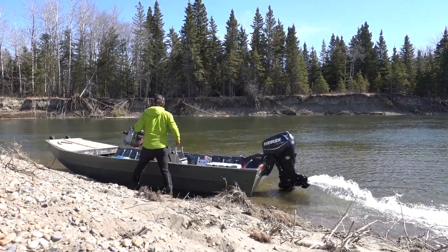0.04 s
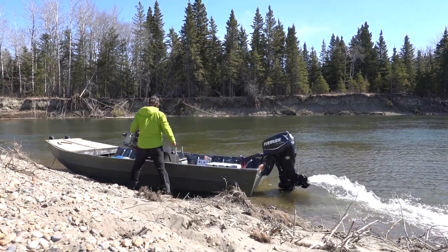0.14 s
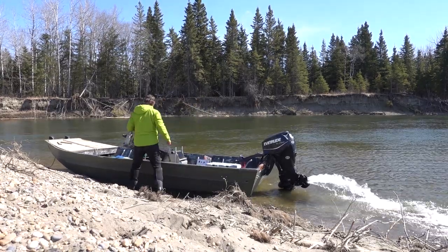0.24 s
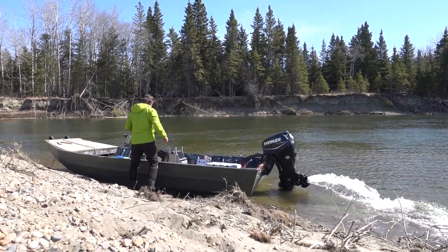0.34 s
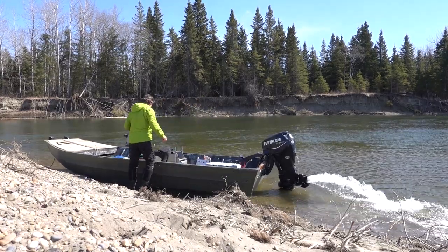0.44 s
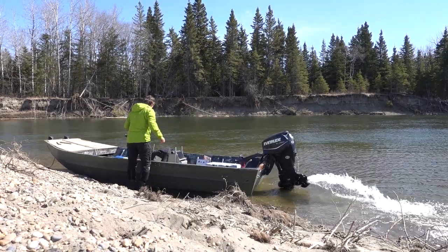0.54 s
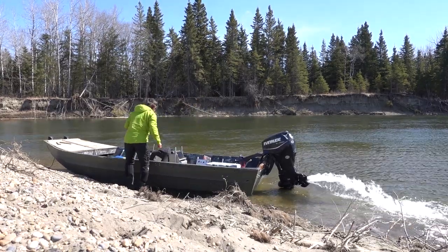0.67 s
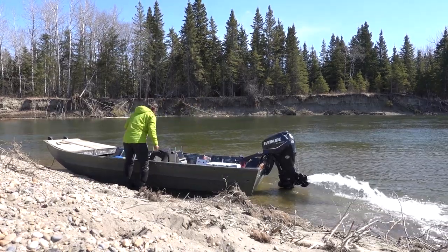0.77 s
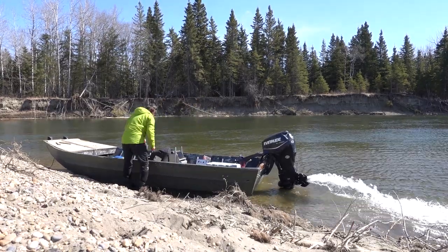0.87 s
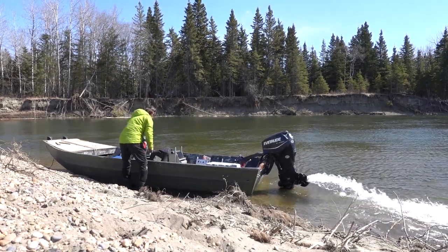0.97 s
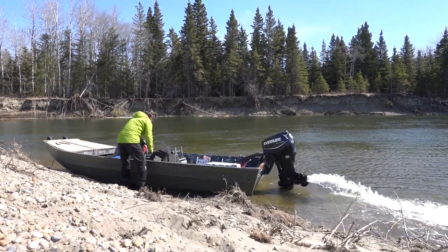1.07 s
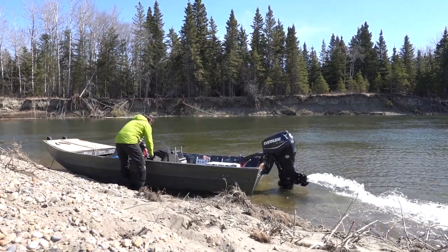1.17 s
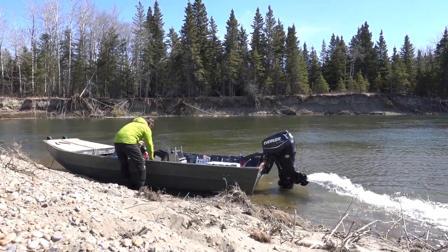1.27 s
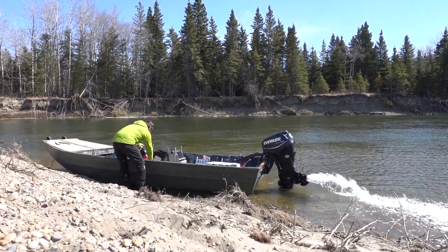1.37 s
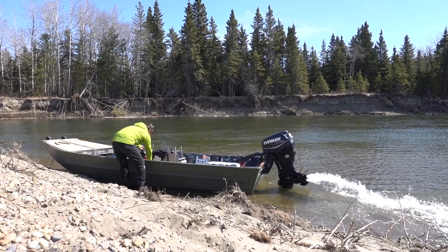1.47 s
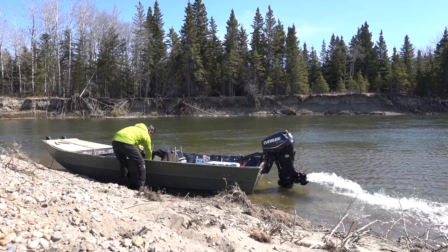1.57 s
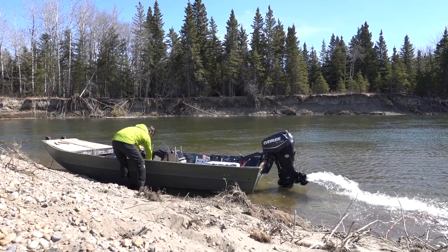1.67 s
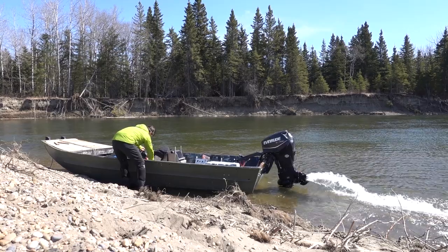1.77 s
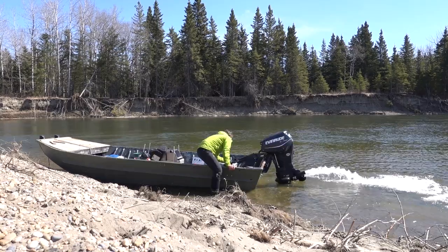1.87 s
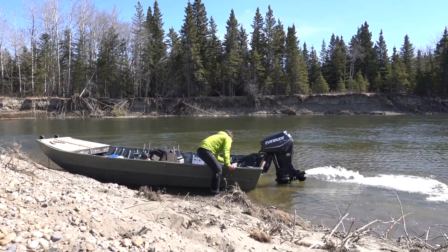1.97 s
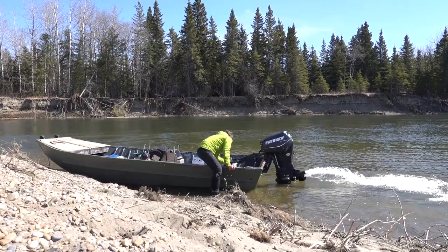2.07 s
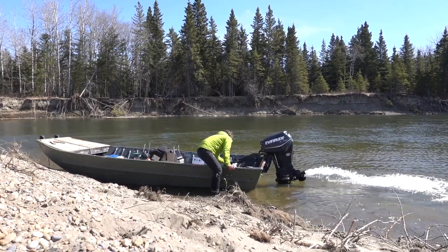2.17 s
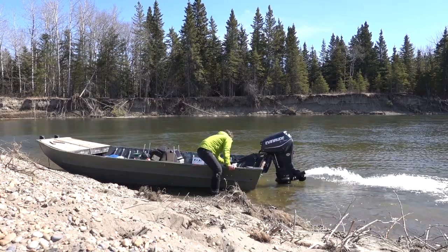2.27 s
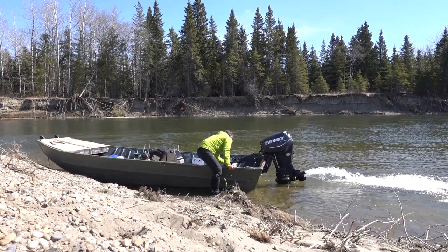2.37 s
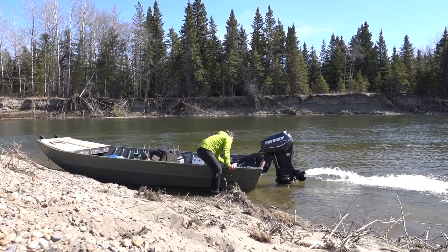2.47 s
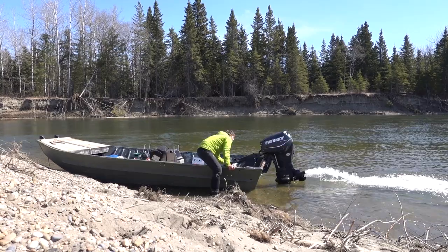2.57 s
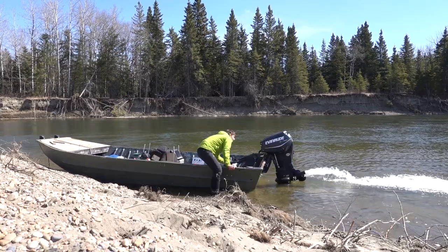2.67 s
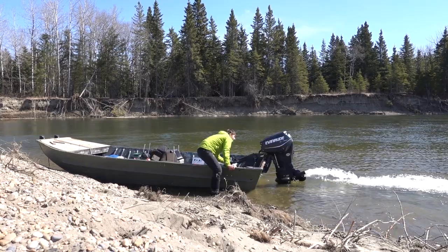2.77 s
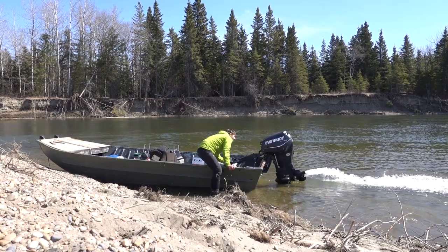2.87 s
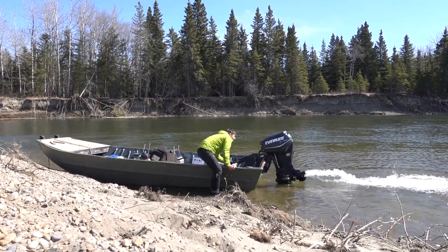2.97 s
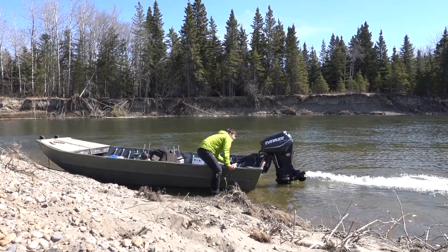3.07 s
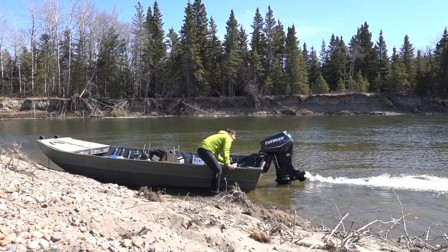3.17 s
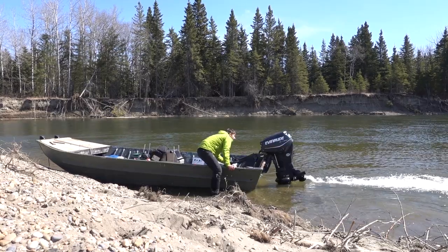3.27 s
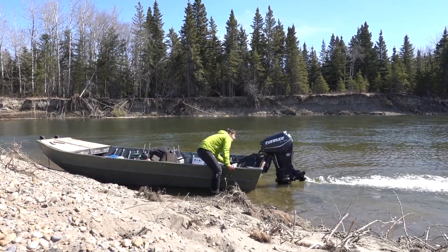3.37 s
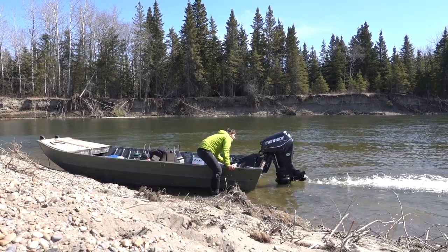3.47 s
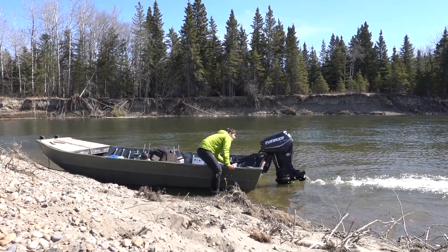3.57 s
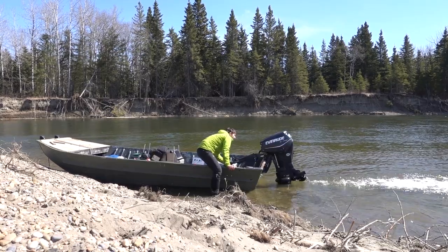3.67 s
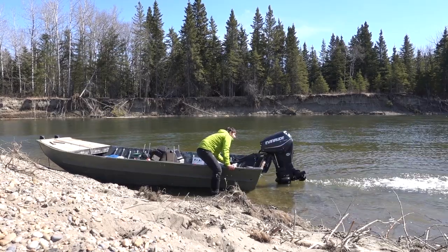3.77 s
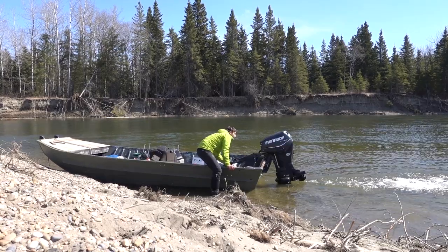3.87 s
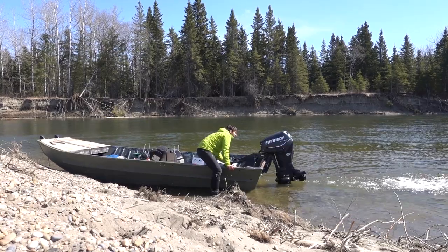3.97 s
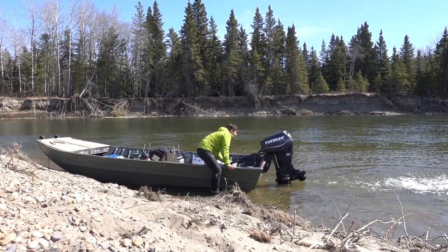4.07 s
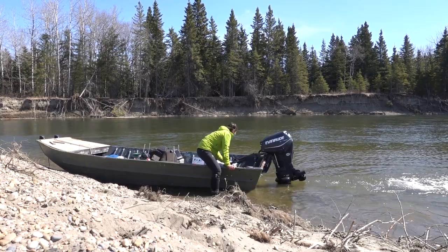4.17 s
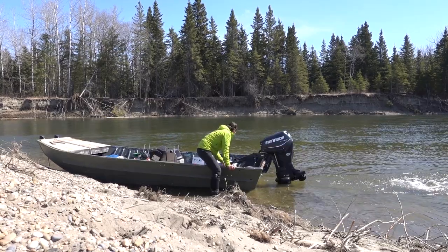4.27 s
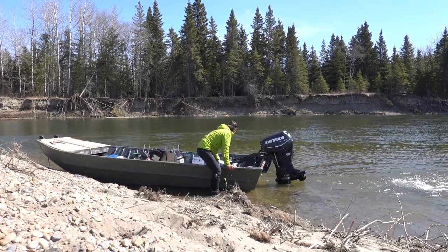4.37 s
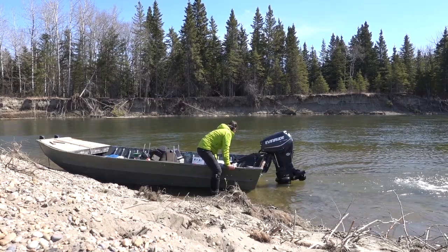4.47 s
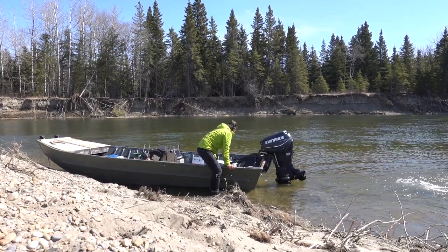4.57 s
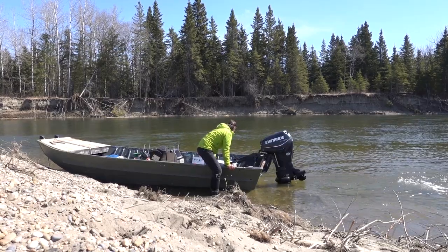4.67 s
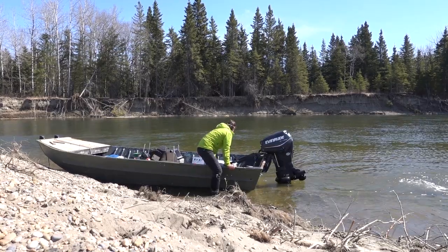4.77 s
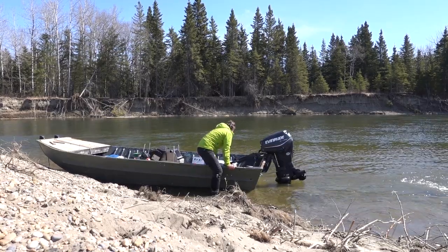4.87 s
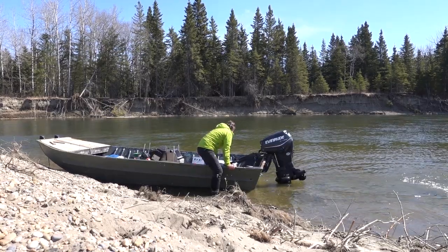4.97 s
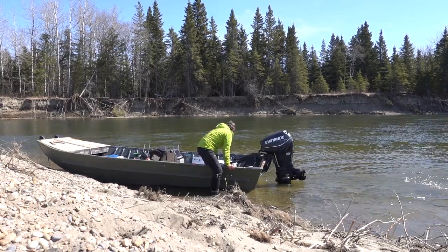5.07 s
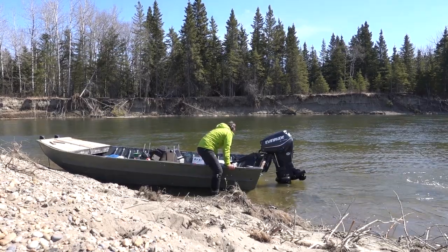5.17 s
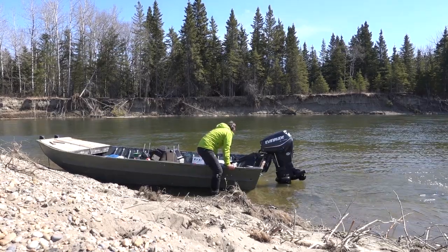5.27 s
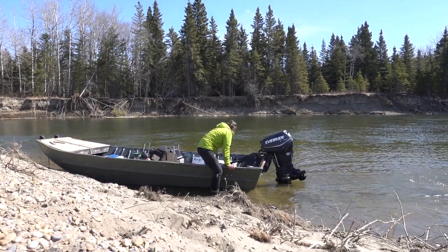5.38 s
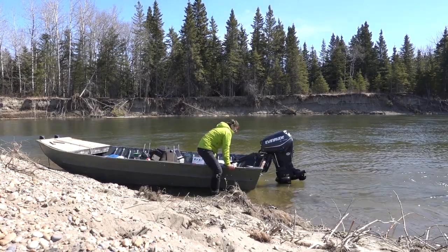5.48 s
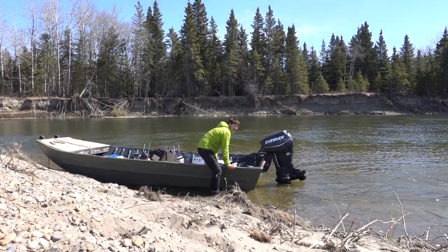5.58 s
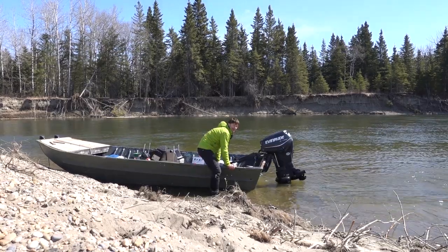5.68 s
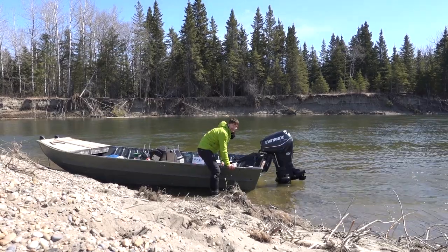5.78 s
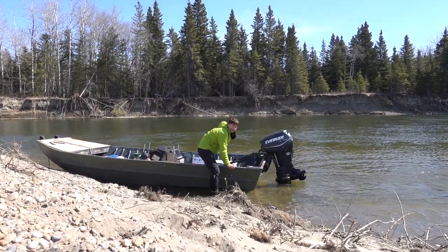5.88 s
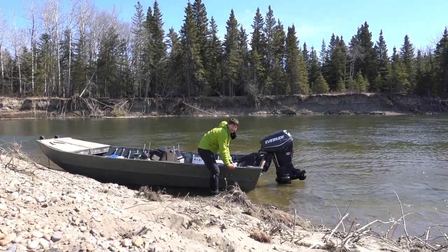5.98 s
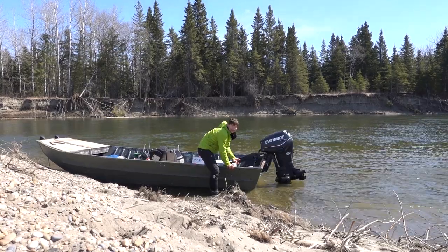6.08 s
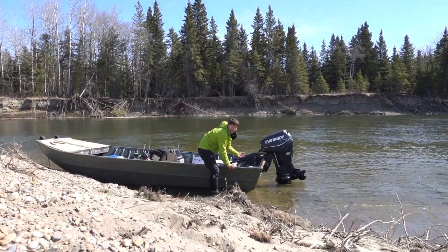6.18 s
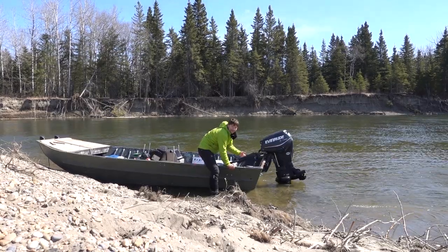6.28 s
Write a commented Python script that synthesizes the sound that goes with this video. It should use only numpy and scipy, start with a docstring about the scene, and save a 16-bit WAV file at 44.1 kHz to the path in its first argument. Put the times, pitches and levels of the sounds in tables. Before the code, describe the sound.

A misfiring outboard putters fast and hollow, spraying a hissing, spattering stream into a river. Strokes weaken and slow to a stop, the splash falls away, and small bright drips and bubbling plops stand out among hollow thuds and taps on a thin metal hull. The open-air microphone is buffeted by low wind throughout; the sound chokes and cuts out briefly, and a faint wavering hollow hum comes through later.

```python
"""An outboard jet motor putters at a misfiring idle, tilted clear of a river and spitting water; then it runs down.
Firing strokes ring the exhaust housing and puff gurgling gas; the stream is flickering hiss plus ringing drops.
Lapping, drips (rising sine bubbles) and knocks on a metal hull (tuned modes) take over as someone moves about in it.
Behind it all, band-limited noise buffets the microphone, a hollow hum wavers, and the sound briefly drops out."""
import sys
import numpy as np
from scipy import signal
from scipy.fft import rfft, irfft
from scipy.io import wavfile

SR = 44100
rng = np.random.default_rng(int(sys.argv[2]) if len(sys.argv) > 2 else 0)


def wav_out(sig):
    """Save sig, one row per channel (or a flat mono array), as 16-bit PCM at SR to the path in sys.argv[1]."""
    wavfile.write(sys.argv[1], SR, np.round(np.clip(np.atleast_2d(sig).T, -1, 1) * 32767).astype(np.int16))


N = 279580

# Idling crank before misfires delay it: [t/s, firing strokes so far]
CRANK_STROKES = [(-0.0119, 0), (0.0599, 2), (0.8776, 26), (1.1404, 33), (1.6046, 46), (1.7439, 50),
                 (1.8635, 54), (2.204, 64), (2.3793, 69), (2.5263, 73), (2.7399, 79), (2.8157, 81)]
# Weak strokes and misfires: [t/s, level/dB against a full stroke]
WEAK_STROKES = [(0.166, -2.5), (0.782, -8), (1.115, -9), (1.195, -3), (1.344, -12), (1.458, -13),
                (1.501, -3), (1.651, -16), (2.058, -7), (2.201, -6), (2.345, -7.5), (2.457, -5),
                (2.716, -15)]
# Exhaust blow before the run-down fades: [t/s, pulse level/dB, gurgle level/dB]
EXHAUST_BLOW = [(0, 0, -30.5), (.8, 1, -31), (1.2, -0.5, -32), (1.81, 2.5, -31), (1.84, -35, -32),
                (1.91, 1.5, -31.5), (2.89, 1, -33.5)]
# Resonances of the exhaust housing: [f/Hz, level/dB, t60/s, sign of first swing]
HOUSING_MODES = [(59, -31, 0.12, -1), (84.1, -19.5, 0.15, 1), (116.4, -12.5, 0.04, -1),
                 (196.8, -25, 0.17, -1), (234.3, -22.5, 0.28, -1), (263, -4, 0.035, 1),
                 (338.5, -12.5, 0.14, -1), (424, -6, 0.049, -1), (464.4, -3.5, 0.026, 1),
                 (522, -27.5, 0.11, -1), (640.4, -22, 0.1, -1), (320, -7.5, 0.015, -1)]
# Tone of exhaust gas in water: [f/Hz, relative level/dB per Hz]
GURGLE_SPECTRUM = [(41, -32), (70, -19), (114, -15.5), (165, -10), (209, -1.5), (340, -7.5), (385, -6),
                   (450, -2.5), (540, -13), (660, -13), (891, -29.5), (1200, -37), (1560, -60),
                   (2640, -120)]
# Falling stream, then lapping, before trims: [t/s, hiss level/dB, drops level/dB, spray treble gain/dB]
STREAM_LEVELS = [(0, -44, -39.5, 0), (.5, -38.5, -45, 0.5), (1.6, -41, -41.5, 1), (2.3, -41.5, -45.5, 0.5),
                 (3.1, -42, -42, -1), (3.27, -43.5, -38.5, -1), (3.4, -42.5, -43, -4.5),
                 (3.5, -48, -46.5, -1), (3.62, -57, -51.5, -1), (3.83, -53.5, -57, -1),
                 (3.97, -60, -63, -0.5), (4.1, -65.5, -64.5, 5.5), (5.0, -69, -61, 4.5),
                 (5.5, -73.5, -63, 3.5), (5.9, -68, -61.5, -0.5), (6.34, -66.5, -60, 4)]
# Tone of splashing water: [f/Hz, relative level/dB per Hz]
SPLASH_SPECTRUM = [(410, 1.5), (700, -8.5), (1020, -13), (1560, -7), (1750, -10.5), (2990, -12.5),
                   (4300, -18), (4920, -23.5), (5540, -19.5), (6920, -28), (7790, -23.5), (8650, -30),
                   (9860, -27.5), (11800, -32), (15200, -41), (16000, -54)]
# Slaps of the stream on the river: [t/s, peak level/dB]
STREAM_SLAPS = [(0.166, -29), (0.2389, -46), (0.31, -19), (0.4399, -34), (0.7138, -41), (1.2435, -18),
                (1.539, -15), (1.6194, -41), (1.767, -19), (2.0682, -37), (2.1687, -20), (2.3835, -31),
                (2.9203, -36), (3.0111, -34), (3.0689, -22), (3.15, -31), (3.1986, -49), (3.241, -21),
                (3.3196, -20.5), (3.45, -23.5), (3.584, -33)]
# Single drips and plops: [t/s, bubble level/dB at its start, starting f/Hz]
SINGLE_DRIPS = [(3.6, -56, 613), (3.708, -53, 454), (3.793, -46, 1510), (3.874, -47, 3280),
                (3.915, -57, 5760), (3.963, -48, 2440), (4.017, -52, 4000), (4.048, -54, 1430),
                (4.083, -53, 6500), (4.209, -51, 3180), (4.242, -52, 2440), (4.387, -55, 4600),
                (4.441, -59, 6000), (4.469, -56, 1290), (4.541, -52.5, 1146), (5.043, -48, 5260),
                (5.051, -52, 1035), (5.151, -34, 4390), (5.199, -54, 1810), (5.312, -55, 1330),
                (5.422, -55, 3100), (5.465, -55, 6040), (5.562, -50.5, 1064), (5.577, -45.5, 4140),
                (5.637, -56, 1450), (5.667, -56, 950), (5.742, -67, 6000), (5.778, -51, 660),
                (5.803, -49, 936), (5.9, -52, 9700), (6.004, -52, 6600), (6.085, -59, 1090),
                (6.088, -63, 5300), (6.092, -52, 1590), (6.299, -53, 2750)]
# Knocks and slaps on the hull: [t/s, drive level/dB, f/Hz favoured by the struck spot]
HULL_KNOCKS = [(4.235, -37, 540), (4.272, -41, 530), (4.316, -48, 510), (4.366, -42, 330),
               (4.371, -34.5, 168), (4.385, -55, 470), (4.385, -52, 634), (4.601, -54, 616),
               (4.711, -43, 397), (4.745, -41, 340), (4.777, -44, 308), (4.858, -42.5, 323),
               (4.954, -45, 380), (5.1, -45, 363), (5.217, -40, 340), (5.354, -48, 373),
               (5.419, -35.5, 350), (5.465, -38.5, 328), (5.515, -43.5, 460), (5.61, -57, 480),
               (5.666, -39, 360), (5.719, -39, 303), (5.778, -47, 300), (5.799, -33.5, 285),
               (5.861, -39, 380), (5.977, -36.5, 383), (6.034, -39.5, 302), (6.2, -44, 314),
               (6.233, -35.5, 409)]
# Resonances of the hull plating: [f/Hz, relative level/dB, t60/s]
HULL_MODES = [(169.3, -1.5, 0.44), (222, 5.5, 0.058), (310, -5.5, 0.17), (340, 10, 0.017), (390, 3, 0.034),
              (479.6, -11.5, 0.28), (525.5, 5, 0.048), (660, 0, 0.047)]
# Water sloshing under the hull, drive into its modes: [t/s, level/dB]
HULL_SLOSH = [(3.4, -81), (3.8, -107), (4.6, -93), (4.75, -85), (5.01, -91), (5.26, -91), (5.38, -101),
              (5.51, -84), (6.05, -86), (6.15, -87), (6.3, -73)]
# Wind between gusts, before its lumps: [t/s, buffet level/dB, upper buffet level/dB]
WIND_LEVELS = [(0, -13.5, -23), (.8, -24, -22), (1.7, -20, -20.5), (1.86, -26.5, -30), (2.4, -26.5, -37),
               (2.55, -38, -44), (2.9, -34.5, -43), (3.3, -35.5, -39), (3.5, -24, -52), (4.2, -32, -58),
               (4.65, -28, -57), (5.6, -30.5, -72), (6.0, -31, -52), (6.15, -35, -72), (6.34, -38.5, -75)]
# Gusts added to that wind: [t/s, buffet level/dB, upper buffet level/dB]
WIND_GUSTS = [(.62, -48, -46), (.99, -12.5, -13.5), (1.13, -16.5, -21), (1.65, -31, -23), (1.8, -34, -13),
              (3.42, -28, -42), (3.8, -26, -30), (3.87, -16.5, -54), (4.008, -19, -48), (4.195, -15, -53),
              (4.84, -31, -50), (5.131, -21.5, -42), (5.72, -25.5, -50), (5.91, -34, -67)]
# Hollow hum, before its flicker: [t/s, level/dB]
HUM_LEVELS = [(3.35, -70), (3.37, -50), (3.42, -46), (3.75, -60), (3.77, -45), (3.88, -50), (3.92, -53),
              (4.01, -44), (4.12, -62), (4.16, -47), (4.37, -51), (4.41, -64), (4.51, -58), (4.56, -46.5),
              (4.76, -73), (4.79, -51), (4.86, -52.5), (4.9, -58), (4.95, -53), (5.01, -65), (5.14, -39.5),
              (5.27, -61.5), (5.36, -55), (5.45, -77), (5.47, -53.5), (5.61, -75), (5.66, -49), (5.77, -59),
              (5.81, -67), (5.87, -45), (6.0, -51), (6.15, -69), (6.2, -47), (6.34, -94)]
# Sound choked while a gust swings through: [start t/s, end t/s, relative swing of the gust]
CHOKED_SPANS = [(.0225, .0595, .75), (.644, .673, .7), (1.8195, 1.8495, -1.0), (1.853, 1.858, 0),
                (1.866, 1.874, 0)]
# Short silences: [start t/s, end t/s]
SILENT_SPANS = [(1.8745, 1.8955), (1.8985, 1.919)]

STUMBLE_S, STUMBLE_CARRY = .0062, .5   # delay by a fully lost stroke; share of it added again one stroke later
COAST_PER_S, COAST_S, COAST_STROKES = 25.3, .296, 6   # starting stroke rate, its decay time, strokes left
SPARK_CUT_S, STILL_S = 2.9, 3.42   # only air is pumped from the cut, until the crank stands
AIR_DB, AIR_FADE_DB_PER_S = -13, 27   # drop and fade of the pulses from the cut
GURGLE_FADE_DB_PER_S, STILL_DB_PER_S = 14, 150   # gurgle fade from the cut; extra fade from standstill
THROB_HZ, THROB_T60_S, THROB_DB = 74.6, .045, -28   # main throb of strokes that only pump air
CRACK_DB, OUTLET_DELAY_S = -31, .00325
DROPS_PER_S, SPRAY_HZ = 900, 4060   # typical drop rate, before clumping; lower edge of the spray
HISS_TRIM_DB, DROPS_TRIM_DB = -4.0, -2.5
LAP_TICKS_DB = -4   # bare ticks are trimmed once the crank stands
SLAP_T60_S, SLAP_DB = .061, -12.5   # burst decay; rms against the tabled peak
DRIP_CYCLES = 71   # a 60 dB decay takes so many cycles of the starting pitch
DRIP_TICK_DB, DRIP_TICK_S = -6.5, .035   # tick noise before filtering, against the bubble; its t60
GUST_S, LUMPS_DB = .033, 3.5   # half length of a gust to 1/e; spread of the unevenness
RUSTLE_DB = -36.5   # turbulence above the buffets, against them
HUM_HZ, HUM_WAVER, HUM_WAVER_HZ = 196, .025, 14   # mean pitch, spread of the waver as a share, waver rate
HUM_FLICKER_DB, HUM_FLICKER_HZ = 4.0, 18   # the hum's level breaks up
CUTOFF_HZ = 16600


def strokes():
    """One click a firing stroke: the cylinders alternate in force and a misfire delays the crank."""
    s, count = np.transpose(CRANK_STROKES)
    which = np.arange(int(count[-1]) + 1)
    times = np.interp(which, count, s)
    cylinder = (-1.) ** which
    db = -1.7 * cylinder + 0.46 * rng.standard_normal(len(which))
    for at, weak_db in WEAK_STROKES:
        k = np.argmin(np.abs(times - at))
        delay = STUMBLE_S * (1 - amp(weak_db))
        times[k + 1:] += delay * np.cumsum(STUMBLE_CARRY ** which[:-k - 1])
        db[k + 1] -= 0.0044 * weak_db   # under 0.1 dB, inaudible
        db[k] = weak_db
    times -= .0004 * cylinder
    # crank speed dies away exponentially after the last idling stroke
    turned = np.arange(1, COAST_STROKES + 1) / (COAST_PER_S * COAST_S)
    coasting = times[-1] - COAST_S * np.log(1 - turned)
    clicks = np.zeros(N)
    clicks[(times[1:] * SR).astype(int)] = amp(db[1:])
    clicks[(coasting * SR).astype(int)] = 1
    return clicks


def blow():
    """Exhaust levels: idle curves, then weaker air pulses and fading gurgle as the crank runs down."""
    pulse_db, gurgle_db = in_time(EXHAUST_BLOW)
    t = np.arange(N) / SR
    coasting = np.maximum(t - SPARK_CUT_S, 0)
    still = np.maximum(t - STILL_S, 0)
    pulse_db += (coasting > 0) * AIR_DB - AIR_FADE_DB_PER_S * coasting
    gurgle_db -= GURGLE_FADE_DB_PER_S * coasting + STILL_DB_PER_S * still
    return pulse_db, gurgle_db


def motor(clicks):
    """Each stroke rings the exhaust housing and cracks at the outlet; a puff of gas gurgles out behind it."""
    pulse_db, gurgle_db = blow()
    fired = clicks * amp(pulse_db)
    modes = 0
    for hz, db, t60, sign in HOUSING_MODES:
        # no two strokes drive the modes quite alike
        drive = fired * amp(db + 0.14 * rng.standard_normal(N))
        modes = modes + np.sign(sign) * ring(drive, hz, t60)
    housing = soften(modes, 300)

    outlet = np.roll(fired, int(OUTLET_DELAY_S * SR))   # the blow needs a moment to reach the outlet
    crack = ring(outlet, 654, .028) + 0.6 * ring(outlet, 770, .02) + 0.5 * ring(outlet, 900, .008)

    coasting = np.arange(N) > SPARK_CUT_S * SR
    # squared clicks: a weak charge blows far less gas
    puff = np.where(coasting, 0.25, 0.9) + rms_one(soften(clicks ** 2, 14.7))
    gurgle = rms_one(puff * coloured(GURGLE_SPECTRUM, patchy_db=-1.0, rate_hz=7.6))

    air = clicks * coasting
    throb = soften(ring(air, THROB_HZ, THROB_T60_S) + 0.48 * ring(air, 107, .034), 200)
    return housing + amp(THROB_DB) * throb + amp(CRACK_DB) * crack + amp(gurgle_db) * gurgle


def stream(clicks):
    """Falling water hisses with slight spurts after strokes; clumped drops ring at various pitches or just tick."""
    hiss_db, drops_db, treble_db = in_time(STREAM_LEVELS)
    sizes = amp(6.0 * np.minimum(rng.exponential(1, N), 3.1)) * rng.choice([-1, 1], N)
    born = sizes * (rng.random(N) < DROPS_PER_S * amp(4.5 * drift(25.0)) / SR)
    pitches = np.geomspace(600, 7500, 20)
    dealt = rng.integers(0, 28, N)   # 20 ringing pitches; the other 8 deals are bare ticks
    rings = 0
    for k, hz in enumerate(pitches):
        rings = rings + bloom(born * (dealt == k), hz, 35.0 / hz, 7.0 / hz) * np.sqrt(hz)
    ticks = rms_one(born * (dealt >= 20))
    lapping = np.arange(N) > STILL_S * SR
    drops = rms_one(rings) + 1.67 * ticks * amp(LAP_TICKS_DB * lapping)

    spurts = (1 + 0.11 * rms_one(soften(clicks, 28.6))) * amp(0.14 * drift(31.0))
    hiss = spurts * coloured(SPLASH_SPECTRUM, patchy_db=3.0, rate_hz=60.0)
    water = amp(hiss_db + HISS_TRIM_DB) * hiss
    water += amp(drops_db + DROPS_TRIM_DB) * shape(drops, SPLASH_SPECTRUM)
    spray = band(water, SPRAY_HZ, .45 * SR)   # its share of the water follows its own treble curve
    return water + (amp(treble_db) - 1) * spray


def slaps():
    """A lump of the stream lands: a burst of splash noise that dies fast."""
    s, db = np.transpose(STREAM_SLAPS)
    hits = np.zeros(N)
    hits[(s * SR).astype(int)] = amp(db + SLAP_DB)
    decay = amp(-60 / (SLAP_T60_S * SR))
    burst = soften(signal.lfilter([1], [1, -decay], hits + 1e-18), 230)
    return burst * shape(rng.standard_normal(N), SPLASH_SPECTRUM)


def drips():
    """A drop ticks on the surface and traps a bubble whose pitch rises as it dies."""
    out = np.zeros(N)
    t = np.arange(SR // 10) / SR
    for s, db, hz in SINGLE_DRIPS:
        at = int(s * SR)
        fade = amp(db - 60 * t * hz / DRIP_CYCLES) * np.minimum(t / .00073, 1)   # short attack
        bubble = np.sin(2 * np.pi * hz * t * (1 + 0.91 * t)) * fade
        spit = rng.standard_normal(len(t)) * amp(db + DRIP_TICK_DB - 60 * t / DRIP_TICK_S)
        tick = band(spit, .72 * hz, 1.1 * hz)
        out[at:at + len(t)] += (bubble + tick)[:N - at]
    return out


def hull():
    """A knock drives the plating's modes nearest the pitch of its spot; sloshing water rumbles in the same modes."""
    s, peak_db, spot_hz = np.transpose(HULL_KNOCKS)
    chance = rng.standard_normal((len(s), len(HULL_MODES)))
    uneven_db = 3.5 * drift(14.0)
    slosh = band(band(rng.standard_normal(N), 230, 440), 230, 440)
    slosh *= amp(in_time(HULL_SLOSH)[0] + uneven_db) * (np.arange(N) > STILL_S * SR)
    out = np.zeros(N)
    for k, (hz, db, t60) in enumerate(HULL_MODES):
        drive = slosh * amp(db)
        off_spot_db = -110 * np.log2(hz / spot_hz) ** 2
        drive[(s * SR).astype(int)] += amp(peak_db + db + off_spot_db + 2.0 * chance[:, k])
        out += bloom(drive, hz, t60, .048)
    return out


def hollow_hum(noise):
    """A wavering sine blended with a narrow band of noise around it, in a level that flickers."""
    pitch = HUM_HZ * (1 + HUM_WAVER * drift(HUM_WAVER_HZ))
    tone = np.sin(2 * np.pi * np.cumsum(pitch) / SR)
    breath = rms_one(band(band(noise, 166, 227), 166, 227))
    flicker_db = HUM_FLICKER_DB * drift(HUM_FLICKER_HZ)
    level = soften(amp(in_time(HUM_LEVELS)[0] + flicker_db), 50)
    return rms_one(tone + 0.33 * breath) * level


def wind_levels():
    """Uneven wind, with each gust swelling out of it and sinking back."""
    t = np.arange(N) / SR
    lumps_db = LUMPS_DB * np.array([drift(16.0), drift(33.0)])
    gains = amp(np.array(in_time(WIND_LEVELS)) + lumps_db)
    for s, *db in WIND_GUSTS:
        gains += amp(db)[:, None] * np.exp(-((t - s) / GUST_S) ** 2)
    return gains


def wind():
    """Turbulent pressure on the microphone, lumpy low noise with a faint rustle; and the hollow hum."""
    low, upper = wind_levels()
    white = rng.standard_normal((2, N))
    buffet = low * rms_one(band(band(white[0], 8, 25), 8, 25))
    buffet += upper * rms_one(band(band(white[1], 23, 49), 23, 49))
    buffet += low * amp(RUSTLE_DB) * rms_one(band(white[0], 62, 134))
    return buffet, hollow_hum(white[1])


def gust_swings():
    """Pressure builds one way, then swings to the other side while the sound is choked."""
    out = np.zeros(N)
    t = np.arange(N) / SR
    for start, end, swing in CHOKED_SPANS:
        before = np.exp(-((t - start + .00063) / .024) ** 2)
        progress = np.clip((t - start) / (end - start), 0, 1)
        during = np.sin(np.pi * progress ** 0.72)
        out += swing * (.5 * before - 0.72 * during)
    return out


def gate(spans, edge_hz):
    """Soft-edged gate: open outside the spans, closing towards 0 inside."""
    shut = np.zeros(N)
    for start, end, *_ in spans:
        shut[int(start * SR):int(end * SR)] = 1
    return 1 - soften(shut, edge_hz)


def amp(db):
    """dB to gain."""
    return 10 ** (np.asarray(db) / 20)


def rms_one(x):
    """Scaled to rms 1."""
    return x / np.sqrt(np.mean(x ** 2) + 1e-20)


def in_time(rows):
    """Curve columns, interpolated sample by sample."""
    s, *columns = np.transpose(rows)
    t = np.arange(N) / SR
    return [np.interp(t, s, column) for column in columns]


def soften(x, hz):
    """Double one-pole low-pass."""
    r = np.exp(-2 * np.pi * hz / SR)
    return signal.lfilter([(1 - r) ** 2], [1, -2 * r, r * r], x)


def drift(rate_hz):
    """Slow random wander of rms 1."""
    return rms_one(soften(rng.standard_normal(N + SR), rate_hz)[SR:])   # first second settles the filter


def band(x, low_hz, high_hz):
    """Butterworth band-pass."""
    return signal.sosfilt(signal.butter(2, [low_hz, high_hz], "band", fs=SR, output="sos"), x)


def ring(clicks, hz, t60):
    """A two-pole resonator: a unit click sets a decaying sine of starting height 1 ringing."""
    r = amp(-60 / (max(t60, .002) * SR))
    w = 2 * np.pi * hz / SR
    return signal.lfilter([0, np.sin(w)], [1, -2 * r * np.cos(w), r * r], clicks + 1e-18)


def bloom(clicks, hz, t60, touch_s):
    """A soft touch drives the mode for a moment at its own pitch, so that it swells in without a click."""
    return ring(ring(clicks, hz, touch_s), hz, t60) * 2 * np.log(1000) / (touch_s * SR)


def shape(x, spectrum):
    """Imposes a spectrum; rms 1."""
    hz, db = np.transpose(spectrum)
    bins = np.fft.rfftfreq(N, 1 / SR) + 1   # +1 keeps the logarithm finite
    gain = amp(np.interp(np.log(bins), np.log(hz), db))
    return rms_one(irfft(rfft(x) * gain, N))


def coloured(spectrum, patchy_db, rate_hz):
    """Noise in roughly third-octave bands; neighbours flicker apart."""
    low_hz, high_hz = spectrum[1][0], min(spectrum[-2][0], .45 * SR)
    edges = np.geomspace(low_hz, high_hz, int(3 * np.log2(high_hz / low_hz)))
    white = rng.standard_normal((2, N))
    flicker = [drift(rate_hz) for k in range(3)]
    out = 0
    for k, (low, high) in enumerate(zip(edges, edges[1:])):
        out = out + amp(patchy_db * flicker[k % 3]) * band(white[k % 2], low, high)
    return shape(out, spectrum)


def scene():
    """All sources in one channel; choking gates them sharply and the buffets softly."""
    clicks = strokes()
    buffet, hum = wind()
    sounds = motor(clicks) + stream(clicks) + slaps() + drips() + hull() + hum
    air = gate(CHOKED_SPANS, 28) * buffet + gust_swings()
    return (gate(CHOKED_SPANS, 700) * sounds + air)[None]


def record(dry):
    """Rounded peaks, two short silences, a steeply cut top."""
    x = gate(SILENT_SPANS, 13000) * np.tanh(dry)
    return signal.sosfilt(signal.cheby2(12, 70, CUTOFF_HZ, fs=SR, output="sos"), x)


dry = scene()
out = record(dry)
wav_out(out)
```